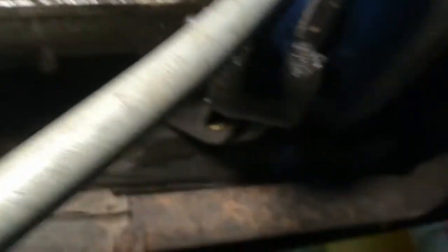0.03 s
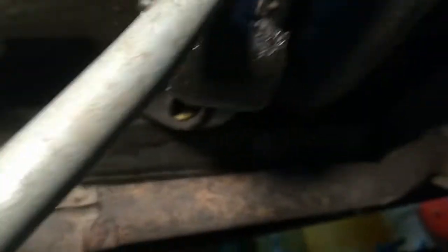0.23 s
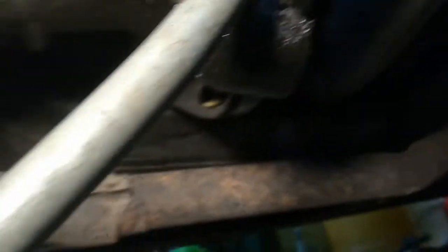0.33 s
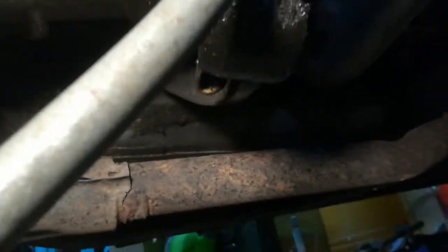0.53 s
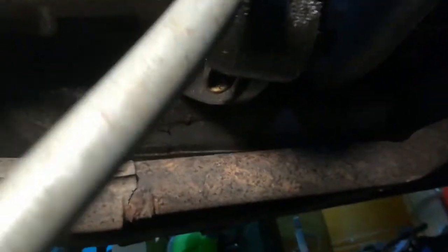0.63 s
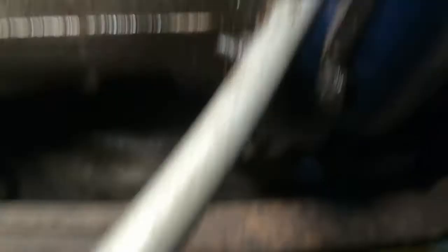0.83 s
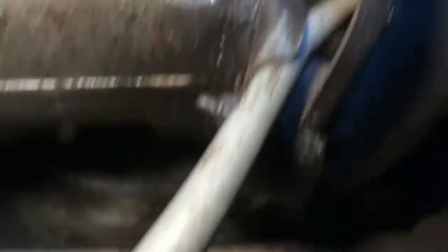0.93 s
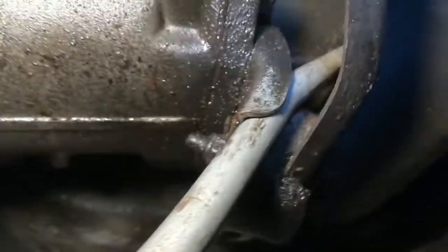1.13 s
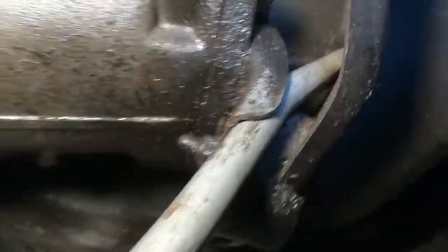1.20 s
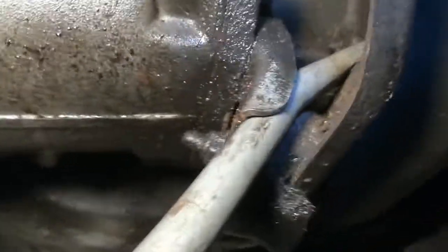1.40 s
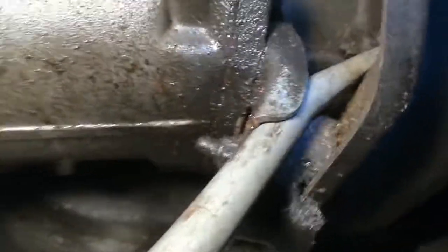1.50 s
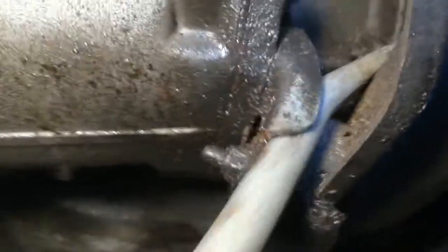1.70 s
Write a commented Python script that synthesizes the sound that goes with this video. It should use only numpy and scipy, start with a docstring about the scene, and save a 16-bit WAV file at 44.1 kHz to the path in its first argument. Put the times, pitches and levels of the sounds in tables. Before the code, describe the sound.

A loose steel bar judders close by under a car and knocks hard at about 0.25 seconds, two softer blows right behind, leaving a brief metallic ring and low boom. It rubs back more quietly around 0.6 seconds. Faint squeaks come at 1.1 and 1.4, light clacks near 1.5, and a gritty scrape around 1.75. Soft hand bumps, rustle and a faint garage rumble lie beneath.

```python
"""A loose steel bar, worked by hand under a parked car, close to the microphone.
It judders in its mount by stick and slip, knocks once hard with two softer blows just behind,
and rings the underbody; then it rubs back, the joint squeaks faintly and the linkage clacks.
Bumps and rustle of the hand and the faint rumble of the garage lie beneath. Stereo."""
import sys
import numpy as np
from scipy import signal
from scipy.fft import rfft, irfft
from scipy.io import wavfile

SR = 44100
rng = np.random.default_rng(int(sys.argv[2]) if len(sys.argv) > 2 else 0)


def master_out(mix):
    """Clip the mix to full scale and print it as 16-bit PCM to the path in sys.argv[1]."""
    frames = np.transpose(np.atleast_2d(mix))
    ceiling = np.clip(frames, -1, 1)
    pcm = np.round(ceiling * 32767).astype(np.int16)
    wavfile.write(sys.argv[1], SR, pcm)


N = 77175
TIME = np.arange(N) / SR
FREQS = np.maximum(np.fft.rfftfreq(2 * N, 1 / SR), 1)
ALIKE_BELOW_HZ, MODE_SPREAD_RAD = 210, 1.47  # left and right: alike in the bass, upper modes out of step

# blows of the bar: t/s, level/dB
BLOWS = [(0.2363, 2.5), (0.2524, -8), (0.2592, -8.5)]
# ring time of the underbody panels: f/Hz, T60/s
PANEL_T60 = [(120, 0.5), (300, 0.23), (700, .22), (1500, 0.21), (3900, 0.19), (10000, 0.135)]
# balance of the panels at the microphone: f/Hz, left over right/dB
PANEL_PAN = [(250, -2), (1300, -6), (2400, 3), (4400, 8), (8000, -1.5), (15000, -4)]
# spectrum of grit in mount and joint: f/Hz, relative level/dB
GRIT = [(800, -18.5), (2400, -3), (3400, 3), (4400, 2.5), (5500, -7.5), (8400, -10), (10500, -22.5),
        (15000, -23.5)]


def undb(db):
    """Decibels to gain."""
    return 10 ** (np.asarray(db) / 20)


def over_hz(points, hz=FREQS):
    """Read (Hz, value) points on a log-frequency axis."""
    f, v = np.array(points).T
    return np.interp(np.log(hz), np.log(f), v)


def unit(x):
    """Scale to rms 1."""
    return x / np.sqrt(np.mean(x ** 2) + 1e-18)


def shape(x, gain):
    """Filter by a gain per frequency."""
    return irfft(rfft(x, 2 * N) * gain)[..., :N]


def hump(hz, octaves):
    """Gain curve of one resonance."""
    return 1 / (1 + (np.log2(FREQS / hz) / octaves) ** 2 / 2) ** 2


def pan(db):
    """Left and right gains for a level difference."""
    return undb(np.array([[1], [-1]]) * db / 2)


def noise(gain):
    """Stereo noise of rms 1, alike on both sides in the bass and unrelated in the treble."""
    mid, side = rng.standard_normal((2, N))
    side = shape(side, FREQS ** 2 / np.hypot(FREQS ** 2, ALIKE_BELOW_HZ ** 2))
    return unit(shape(np.array([mid + side, mid - side]), gain))


def walk(rate_hz):
    """Smooth random drift of rms 1."""
    return unit(shape(rng.standard_normal(N), np.exp(-(FREQS / rate_hz) ** 2)))


def swell(start, peak, end):
    """Rounded rise and fall."""
    return np.sin(np.pi / 2 * np.interp(TIME, [start, peak, end], [0, 1, 0])) ** 2


def strike(start, attack, decay):
    """Quick rise and exponential fall, with time constants in seconds."""
    age = np.maximum(TIME - start, 0)
    return (1 - np.exp(-age / attack)) * np.exp(-age / decay)


def garage(room_db=-63.5, rumble_hz=27.5, waver=0.1):
    """Faint room tone around the car, over a very deep, wavering rumble."""
    # room tone: f/Hz, relative level/dB
    room_spectrum = [(55, -10), (100, -3.5), (200, -22), (450, -27), (15000, -42)]
    # course of the rumble: t/s, level/dB
    rumble_level = [(0.15, -57.5), (0.33, -48.5), (0.9, -70), (1.5, -74.5), (1.7, -57.5)]
    phase = 2 * np.pi * np.cumsum(rumble_hz * (1 + waver * walk(12))) / SR
    rumble = undb(np.interp(TIME, *np.array(rumble_level).T)) * unit(np.sin(phase))
    return rumble + undb(room_db) * noise(undb(over_hz(room_spectrum)))


def handling():
    """The hand bumps dully; sleeve and hand slide with a soft rustle."""
    # bumps of the hand: start t/s, peak t/s, end t/s, level/dB
    bump_events = [(0.13, 0.201, 0.32, -38.5), (0.302, 0.328, 0.344, -38.5), (0.56, 0.641, 0.82, -49.5),
                   (1.466, 1.497, 1.54, -57.5), (1.648, 1.695, 2.4, -46.5)]
    # spectrum of a bump: f/Hz, relative level/dB
    bump_spectrum = [(30, -9), (55, -10), (105, 1.5), (160, -2), (260, -16.5), (800, -56.5)]
    # course of the sliding: t/s, level/dB
    slide_level = [(0, -64), (0.10, -74.5), (0.40, -49), (0.85, -87.5), (1.04, -67.5), (1.18, -58.5),
                   (1.36, -56.5), (1.52, -49.5), (1.62, -61)]
    # spectrum of the sliding: f/Hz, relative level/dB
    slide_spectrum = [(90, -2), (240, -1), (335, 4.5), (500, -13), (1050, -6.5), (1350, -15.5),
                      (1750, -14.5), (3000, -20), (15000, -42)]
    bumps = sum(undb(db) * swell(start, peak, end) for start, peak, end, db in bump_events)
    slide = undb(np.interp(TIME, *np.array(slide_level).T))
    return bumps * noise(undb(over_hz(bump_spectrum))) + slide * noise(undb(over_hz(slide_spectrum)))


def squeaks(rough_db=2, hiss_db=-10.5, edge_power=4.6):
    """Thin, rough tones; an octave and a gritty hiss come in as the joint is pressed hardest."""
    # squeaks: start t/s, peak t/s, end t/s, f/Hz, level/dB, pitch waver/share, octave re tone/dB
    presses = [(0.404, 0.405, 0.5, 691, -50, 0.036, -13), (1.089, 1.143, 1.34, 1761, -64.5, 0.0093, -11),
               (1.371, 1.402, 1.56, 1790, -60, 0.0089, -3.5)]
    out = 0
    for start, peak, end, hz, db, waver, octave_db in presses:
        press = swell(start, peak, end)
        phase = 2 * np.pi * np.cumsum(hz * (1 + waver * walk(133))) / SR
        edge = undb(octave_db) * np.sin(2 * phase) + undb(hiss_db) * noise(undb(over_hz(GRIT)))
        level = np.sqrt(2) * undb(db + rough_db * walk(44))
        out = out + level * (press * np.sin(phase) + press ** edge_power * edge)
    return out


def clacks(rough_db=1.0, attack_s=.001):
    """Light, gritty contacts ring the linkage and die away under the car."""
    # contacts: t/s, level/dB, decay/s, centre f/Hz, width/octaves, left over right/dB
    contacts = [(0.1126, -44.5, 0.03, 2690, 0.65, 3.5), (0.375, -53, 0.021, 4170, 0.63, 5.5),
                (1.382, -55, 0.15, 3043, 0.76, 6.5), (1.4567, -39, 0.024, 5100, 0.6, 3),
                (1.463, -36, 0.034, 1040, 1.65, 1), (1.515, -45, 0.0037, 9700, 0.54, -11)]
    # resonances of the linkage: f/Hz, lift/dB
    linkage = [(930, 13.5), (1650, 10), (4520, 5.5), (6600, 4), (8400, 6), (15000, 10)]
    body = 1 + sum((undb(db) - 1) * hump(hz, octaves=.08) for hz, db in linkage)
    out = 0
    for start, db, decay, hz, octaves, pan_db in contacts:
        envelope = undb(db + rough_db * walk(230)) * strike(start, attack_s, decay)
        out = out + pan(pan_db) * envelope * noise(body * hump(hz, octaves))
    return out


def judder(hz, jitter, count=600, scatter_db=5):
    """Uneven stick-slip pulses through the resonance of the mount."""
    timing, force = rng.standard_normal((count, 2)).T
    slip_samples = np.cumsum(np.exp(jitter * timing)) * SR / hz
    pulses = np.bincount(slip_samples.astype(int), undb(scatter_db * force), N)[:N]
    return unit(shape(pulses, hump(hz, octaves=0.38)))


def rubs(upper_ratio=2.75, upper_db=-7.5):
    """The bar judders, scrapes and grinds on grit; the mount's upper resonance follows the judder rate."""
    # strokes: start t/s, peak t/s, end t/s, judder f/Hz, jitter/share, judder/dB, scrape/dB, grit/dB
    strokes = [(0.136, 0.18, 0.21, 269.1, 0.2, -35.5, -45, -72),
               (0.177, 0.229, 0.245, 263.7, .16, -30, -36, -52),
               (0.551, 0.566, 0.72, 248.3, 0.082, -45.5, -50.5, -60),
               (0.618, 0.658, 0.67, 232.8, 0.018, -38, -54.5, -58),
               (0.63, 0.688, 0.795, 242.5, 0.064, -47, -54, -61.5),
               (1.658, 1.721, 1.713, 191.4, .15, -47, -47.5, -62),
               (1.71, 1.755, 1.8, 230.9, 0.07, -34.5, -35.5, -42)]
    # scraped resonances of the body: f/Hz, relative level/dB
    scrape_spectrum = [(70, -2.5), (360, 1), (540, -7), (880, -13.5), (1080, -0.5), (1280, -12.5),
                       (1620, -10.5), (2100, -17.5), (5000, -37), (12000, -58)]
    sides = pan(over_hz(PANEL_PAN))
    body = noise(undb(over_hz(scrape_spectrum)) * sides)
    grit = noise(undb(over_hz(GRIT)) * sides)
    out = 0
    for start, peak, end, hz, jitter, judder_db, scrape_db, grit_db in strokes:
        scrape = body + undb(upper_db) * noise(hump(upper_ratio * hz, octaves=.08) * sides)
        rub = undb(judder_db) * judder(hz, jitter) + undb(scrape_db) * scrape + undb(grit_db) * grit
        out = out + swell(start, peak, end) * rub
    return out


def boom(hz=105.3, db=-31, t60_s=0.76):
    """The floor pan holds a low note after the first blow."""
    start = BLOWS[0][0]
    envelope = strike(start, 1 / hz, t60_s / np.log(1000))
    return undb(db) * envelope * np.sin(2 * np.pi * hz * (TIME - start))


def panel_ring(gain_db=-16, build_s=.0015):
    """Every blow feeds the dense ring of the panels around the microphone; the treble dies first."""
    # ring of the panels: f/Hz, relative level/dB
    spectrum = [(55, -22), (150, 4.5), (215, -14), (330, -2.5), (560, -6.5), (1000, -4.5), (1700, 1),
                (2700, -4.5), (3600, -10.5), (4600, -15), (6500, -24), (9500, -33), (15000, -57.5)]
    panels = undb(gain_db) * noise(undb(over_hz(spectrum)) * pan(over_hz(PANEL_PAN)))
    out = 0
    for centre, t60 in PANEL_T60:
        band = over_hz([(hz, float(hz == centre)) for hz, _ in PANEL_T60])
        energy = sum((undb(db) * strike(start, build_s, t60 / np.log(1000))) ** 2 for start, db in BLOWS)
        out = out + np.sqrt(energy) * shape(panels, band)
    return out


def underbody_ring(start, gain_db=-15, build_s=0.0011, t60_share=0.91):
    """Single modes of the struck underbody ring out a little sooner than the panels."""
    # modes of the underbody: f/Hz, relative level/dB
    modes = [(272, -8.5), (375, -17.5), (450, -8), (721, -8.5), (812, -9), (1064, -7), (1346, -6),
             (1418, -7.5), (1547, -5.5), (1704, 1.5), (1831, -4.5), (1874, -6.5), (2283, -12.5),
             (3281, -8.5), (3424, -9.5), (3702, -8)]
    out = 0
    for (hz, db), (turn, side) in zip(modes, rng.uniform(-1, 1, (len(modes), 2))):
        right_shift = MODE_SPREAD_RAD * np.sign(side) * hz / (hz + ALIKE_BELOW_HZ)
        phase = 2 * np.pi * hz * (TIME - start) + np.pi * turn + np.array([[0], [right_shift]])
        envelope = strike(start, build_s, t60_share * over_hz(PANEL_T60, hz) / np.log(1000))
        out = out + undb(gain_db + db) * pan(over_hz(PANEL_PAN, hz)) * envelope * np.sin(phase)
    return out


def crack(start, hz=4600, db=-12.5, decay_s=0.0025):
    """A hard contact of the steel gives a short, bright burst of noise."""
    return undb(db) * strike(start, 1 / hz, decay_s) * noise(hump(hz, octaves=0.59))


def clang(gain_db=-9.5, decay_s=0.0021, pan_db=1.5):
    """Every blow sets off the bar's loud, quickly damped modes; softer blows reach the high ones less."""
    # modes of the bar: f/Hz, relative level/dB
    modes = [(1560, 4.5), (3420, -1), (3680, -6), (4850, -12.5), (7200, -16)]
    dulling = 0.5  # dB lost per octave for each dB that a blow is softer
    out = 0
    for start, blow_db in BLOWS:
        for hz, db in modes:
            tilt_db = dulling * blow_db * np.log2(hz / modes[0][0])
            phase = 2 * np.pi * hz * (TIME - start) + np.array([[1], [-1]]) * MODE_SPREAD_RAD / 2
            out = out + undb(blow_db + db + tilt_db) * strike(start, .5 / hz, decay_s) * np.sin(phase)
    return undb(gain_db) * pan(pan_db) * out


def scene():
    """Everything that reaches the microphone under the car, close to the bar."""
    hardest_s, _ = max(BLOWS, key=lambda blow: blow[1])
    knock = clang() + crack(hardest_s) + panel_ring() + underbody_ring(hardest_s) + boom()
    return knock + clacks() + rubs() + squeaks() + handling() + garage()


def record(dry):
    """The recorder rounds the loudest peaks and cuts the top."""
    drive, top_hz = .5, 15850
    lowpass = signal.ellip(10, .2, 80, top_hz, fs=SR, output="sos")
    return signal.sosfilt(lowpass, np.tanh(drive * dry) / drive)


dry = scene()
out = record(dry)
master_out(out)
```